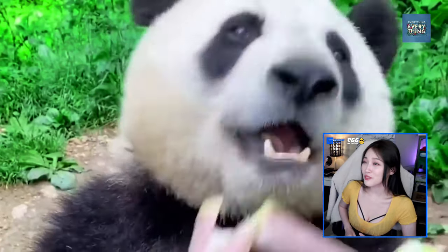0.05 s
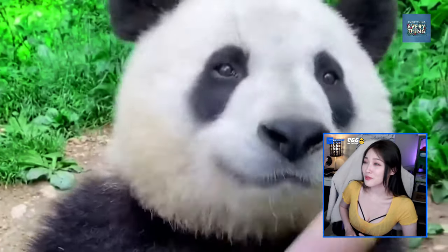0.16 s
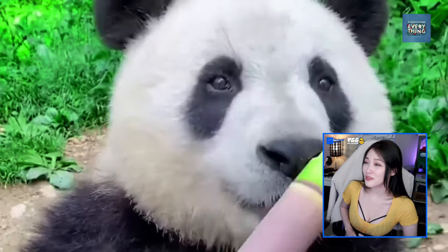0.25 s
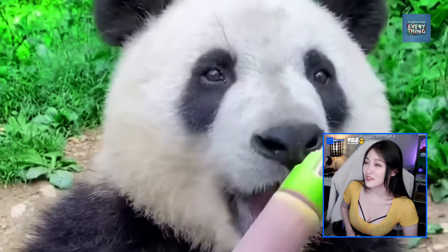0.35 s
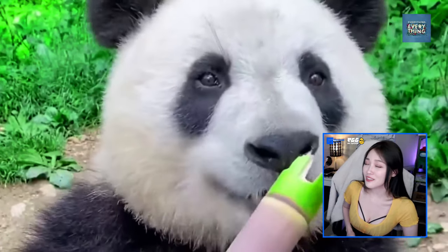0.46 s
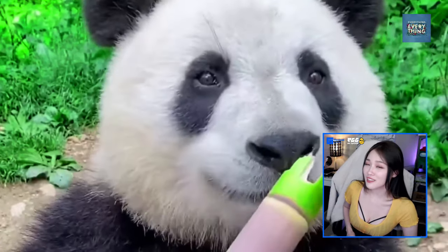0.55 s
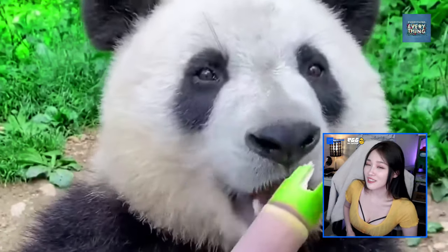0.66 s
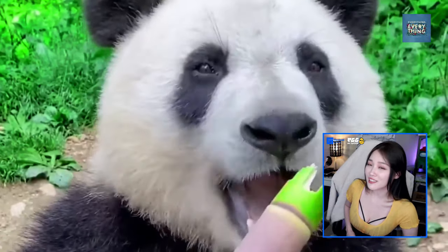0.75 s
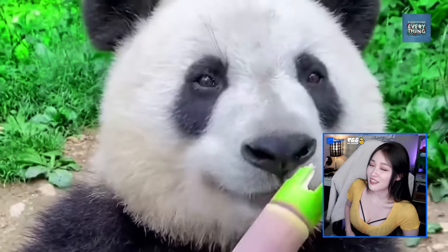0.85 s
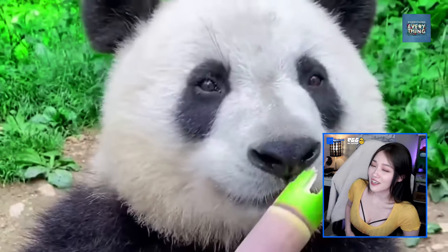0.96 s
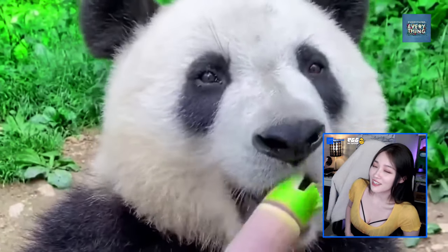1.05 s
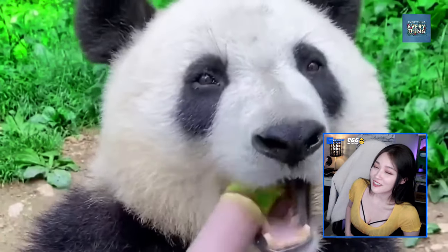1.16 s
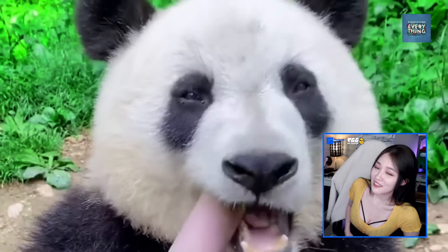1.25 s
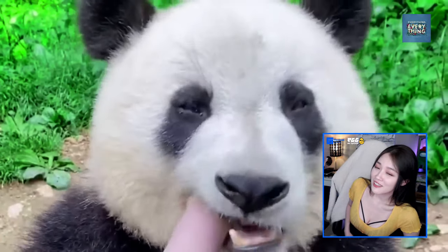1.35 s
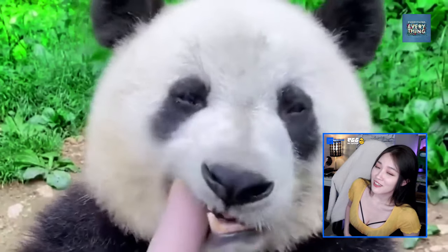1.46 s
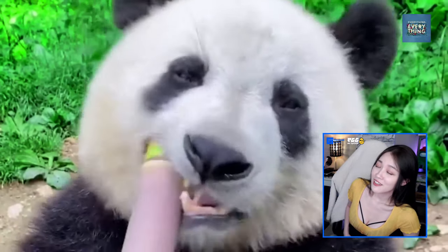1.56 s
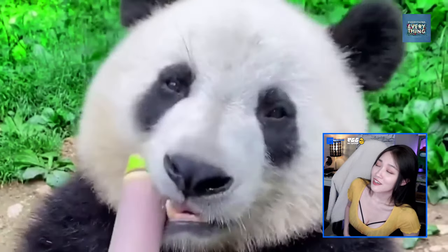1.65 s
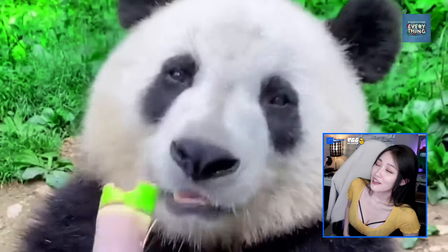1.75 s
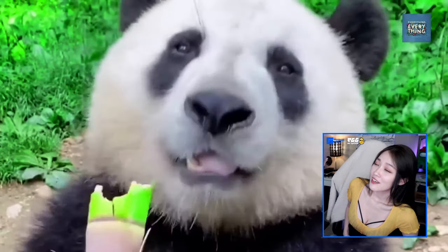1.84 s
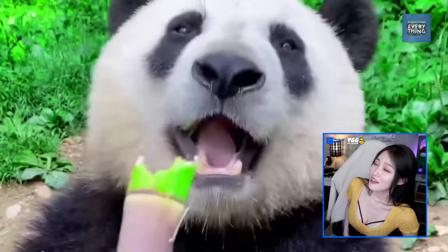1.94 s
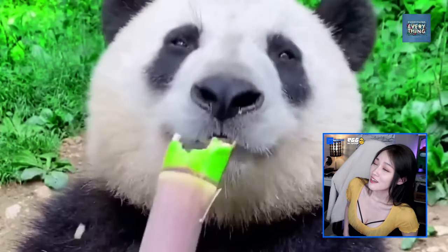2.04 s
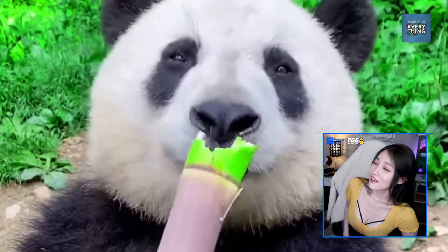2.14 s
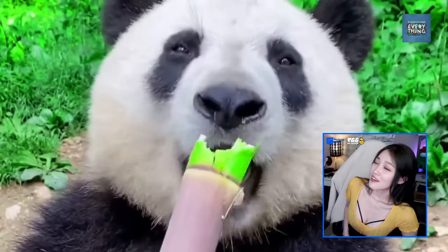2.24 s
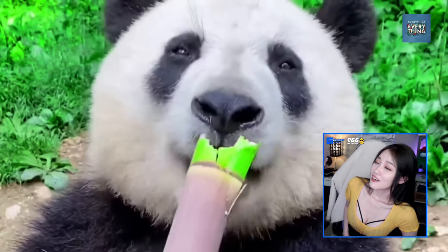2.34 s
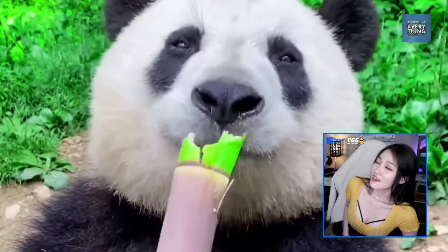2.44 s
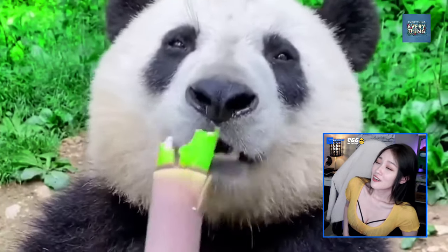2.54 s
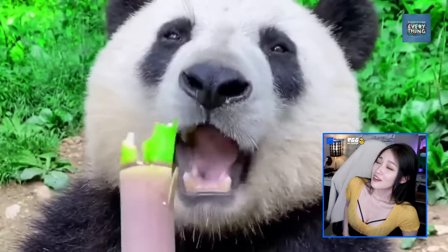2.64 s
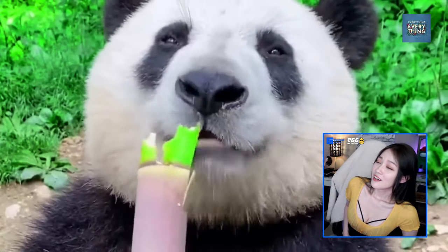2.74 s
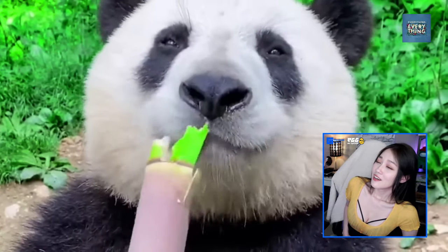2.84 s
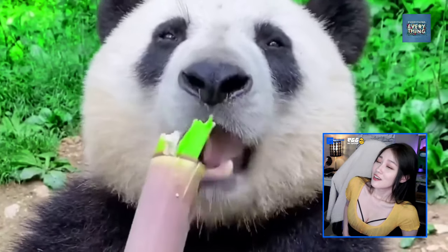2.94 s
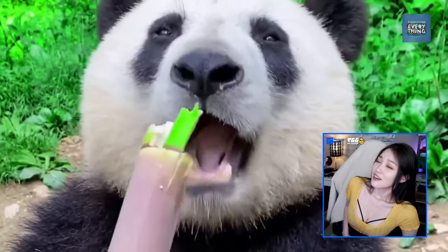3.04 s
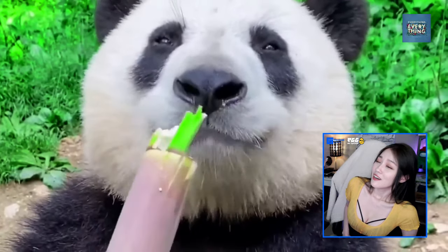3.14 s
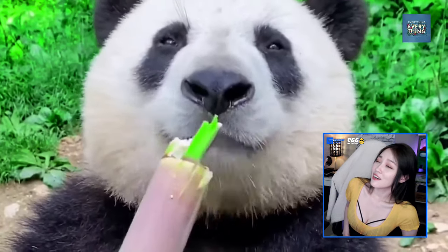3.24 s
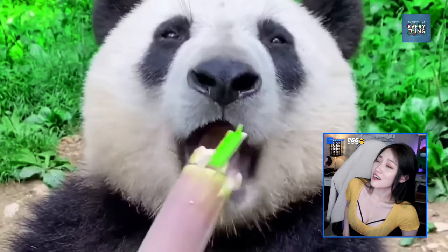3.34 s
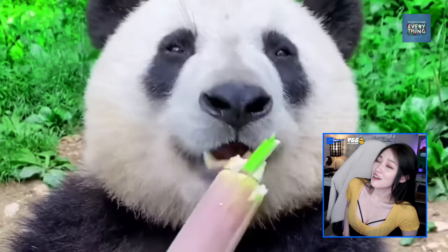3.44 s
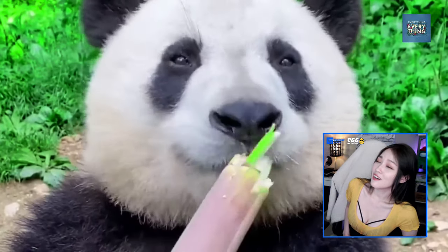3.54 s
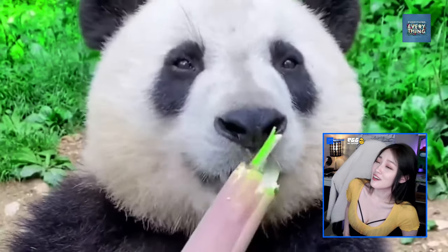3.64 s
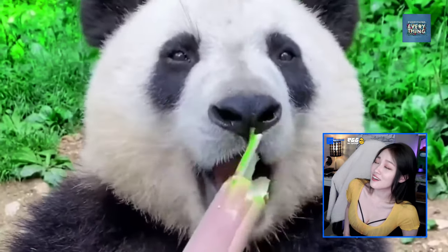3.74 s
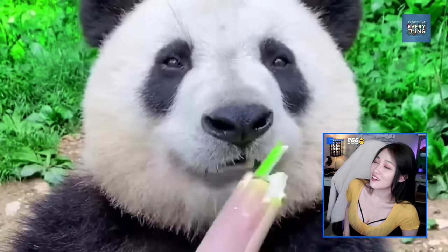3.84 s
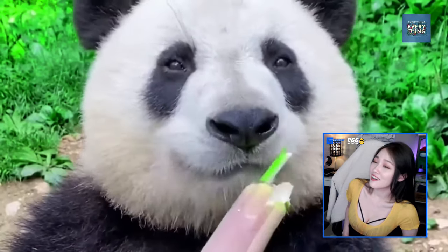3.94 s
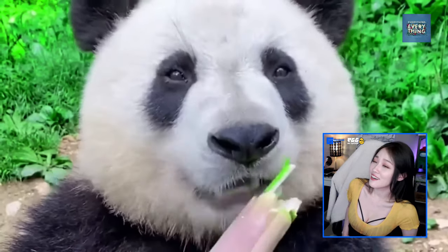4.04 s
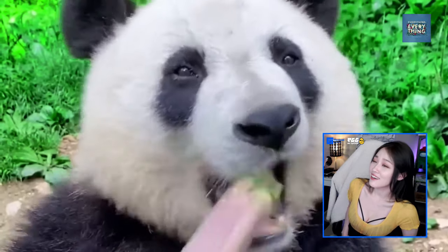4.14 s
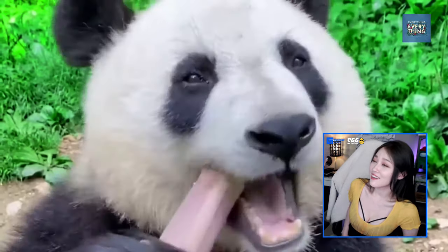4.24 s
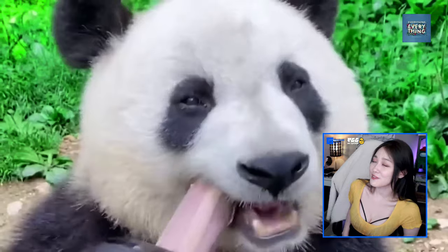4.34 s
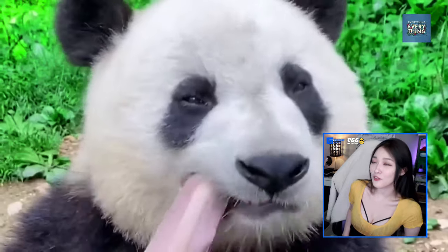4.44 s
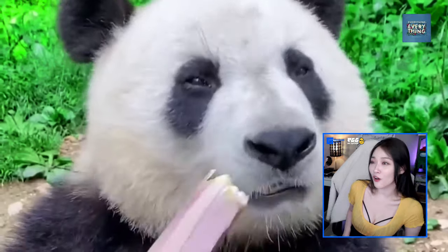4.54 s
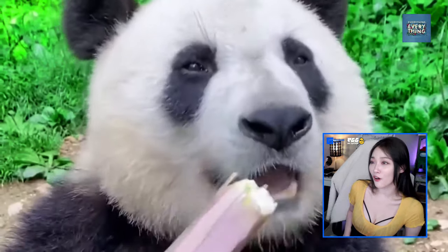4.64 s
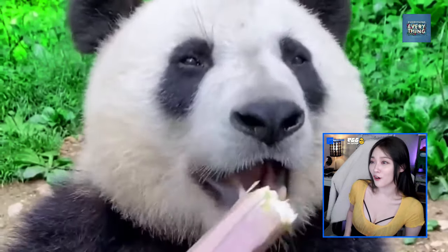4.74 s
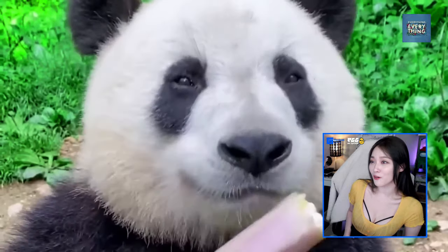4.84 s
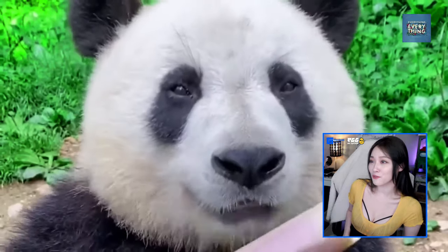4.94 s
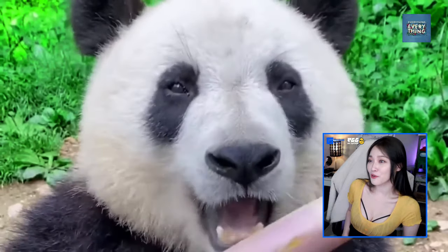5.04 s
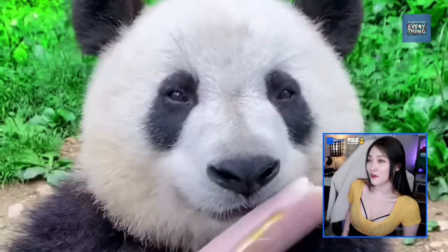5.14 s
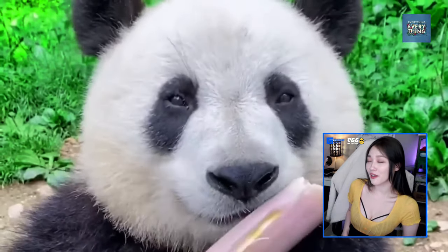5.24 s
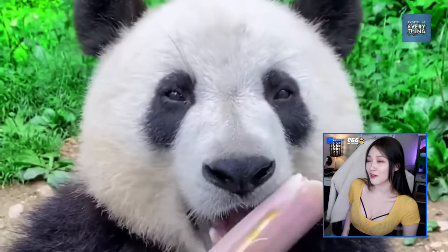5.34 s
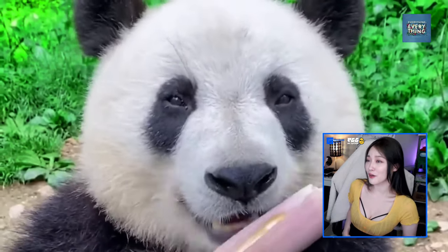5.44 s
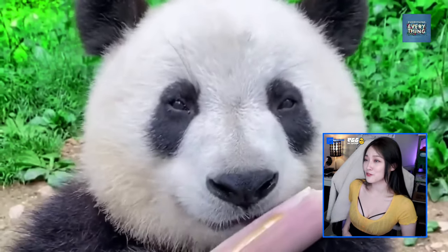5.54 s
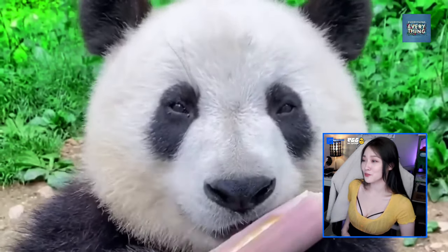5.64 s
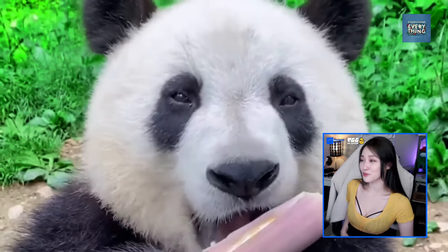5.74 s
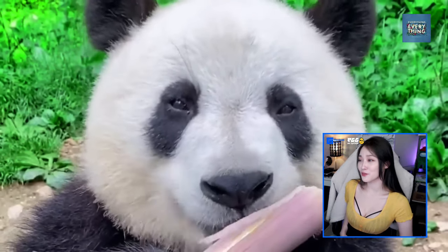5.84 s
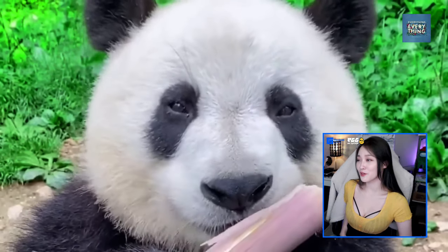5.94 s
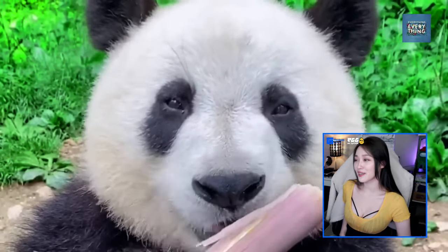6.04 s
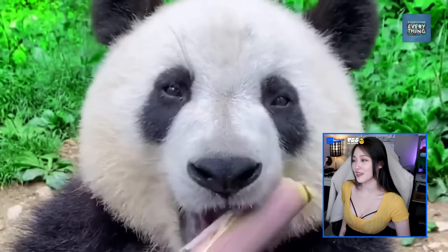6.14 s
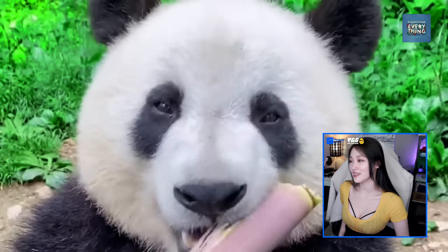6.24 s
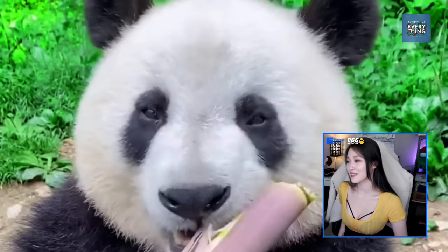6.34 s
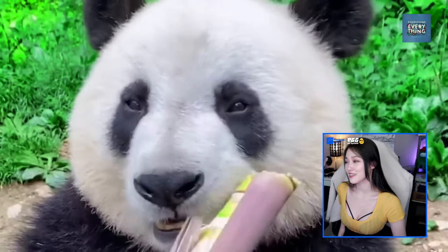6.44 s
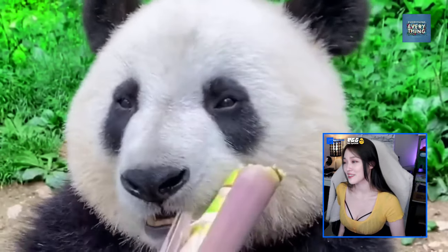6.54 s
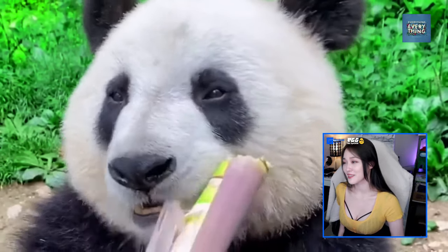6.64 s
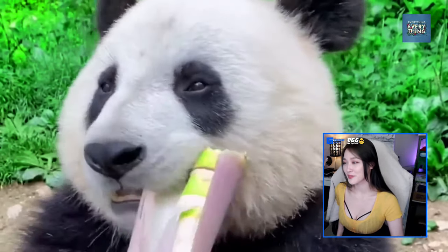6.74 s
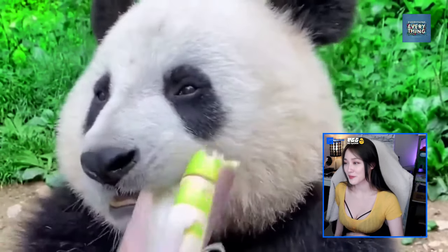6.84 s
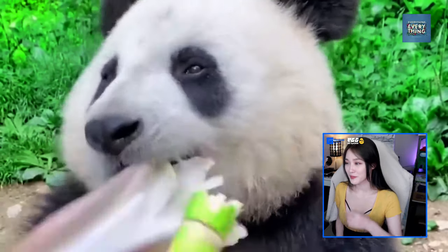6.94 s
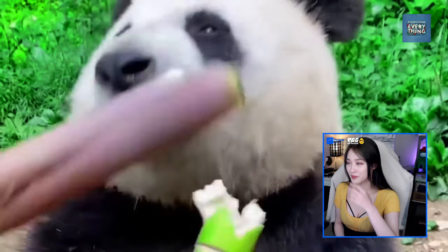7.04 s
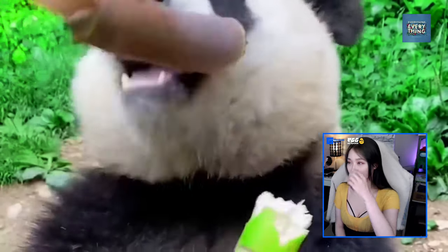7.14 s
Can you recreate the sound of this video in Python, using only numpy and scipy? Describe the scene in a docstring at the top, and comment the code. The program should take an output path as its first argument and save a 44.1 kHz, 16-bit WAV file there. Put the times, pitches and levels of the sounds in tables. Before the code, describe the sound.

Close, juicy crunching and snapping as a panda eats a fresh bamboo shoot, with soft low breath puffs and distant birds over quiet air.

```python
"""Outdoors, close to a stereo microphone, a large animal bites into a crisp plant shoot and chews it.
Every jaw stroke is a dense crackle: random bursts and a wet noise pass through the moving resonances of a mouth.
Single fibres snap as short ringing tones with a noisy crack, and the husk rips with a gliding rasp.
Breath puffs are low noise, mostly about a second and a half apart, with a dull thump under each jaw stroke.
Far birds whistle as gliding sines and twitter as a fluttering noise band, over a quiet air hiss."""
import sys
import numpy as np
from scipy import signal
from scipy.io import wavfile
from scipy.ndimage import uniform_filter1d

SR = 44100
rng = np.random.default_rng(int(sys.argv[2]) if len(sys.argv) > 2 else 0)


def master_out(mix):
    """Clip the mix to full scale and print it as 16-bit PCM to the path in sys.argv[1]."""
    frames = np.transpose(np.atleast_2d(mix))
    ceiling = np.clip(frames, -1, 1)
    pcm = np.round(ceiling * 32767).astype(np.int16)
    wavfile.write(sys.argv[1], SR, pcm)


N = 316901   # length in samples

# Jaw strokes. Each row: time of full bite in seconds, rise, hold and fall in seconds, crunch level
# (0.8-3.5 kHz) in dB, then the hollow (0.3-0.8 kHz), bright (3.5-7.5 kHz) and top (7.5-15 kHz) parts
# in dB relative to the crunch.
JAW_STROKES = [ (.004, 0.057, 0.005, 0.034, -48.5, 2.5, -12, -10),
               (0.187, 0.12, 0.024, 0.24, -39, -8.5, -5.5, -5.5),
               (0.395, 0.041, 0.0011, 0.022, -22.5, -23, -9.5, -15),
               (0.501, 0.007, 0.033, 0.034, -40, -21, -41, -25),
               (.55, .006, 0.042, 0.046, -40, -7.5, -29, -25),
               (.635, 0.0086, 0.02, 0.016, -53.5, 1.5, 1, 6),
               (.745, 0.061, 0.04, 0.039, -37, -11.5, -13, -12),
               (0.873, 0.05, .002, 0.25, -41, -2.5, -36, -26),
               (1.0, 0.022, 0.0066, 0.077, -55, -12, 5.5, 7.5),
               (1.089, 0.025, 0.0022, 0.037, -27, -16.5, -1, -19),
               (1.142, 0.01, 0.011, 0.058, -36, -1.5, -37, -17),
               (1.258, 0.011, .002, 0.017, -46.5, -1, 1.5, 3.5),
               (1.325, 0.0036, .002, 0.029, -58, 6, -18, -20),
               (1.393, 0.021, 0.0018, 0.027, -25.5, -4.5, -19, -17),
               (1.408, 0.0072, 0.018, 0.041, -22.5, -1.5, -21, -12.5),
               (1.458, 0.0055, 0.014, 0.026, -28.5, -18, -8, -11),
               (1.489, 0.016, 0.033, 0.1, -27.5, -8.5, -1.5, -2.5),
               (1.566, .02, 0.093, 0.022, -39, -23, 2.5, 4.5),
               (1.746, 0.027, .002, 0.076, -44, -5.5, 8, 15),
               (1.778, 0.0034, 0.0033, 0.034, -24, -11, -0.5, 2.5),
               (1.946, 0.019, 0.0012, 0.095, -47.5, -12.5, -15.5, -6.5),
               (2.098, 0.057, 0.012, 0.073, -31.5, -43, -13, -22),
               (2.248, 0.014, 0.072, 0.017, -32, -14, -15, -15),
               (2.428, 0.049, .002, 0.2, -37, -7.5, -14, -14.5),
               (2.592, 0.013, 0.041, .02, -41, -19, -17, -16),
               (2.623, 0.012, 0.047, 0.053, -33.5, -8.5, -12.5, -10),
               (2.768, 0.015, 0.011, 0.21, -35, -22, -48, -27),
               (2.956, 0.0038, 0.011, 0.011, -36.5, -30, -22, -22),
               (2.979, 0.0032, 0.045, 0.036, -27.5, -28, -17, -15),
               (3.07, .02, 0.014, 0.019, -50, -25, -33, -22.5),
               (3.182, 0.028, 0.036, 0.035, -31.5, -42, -6, -10.5),
               (3.324, 0.031, 0.006, 0.022, -40.5, -6, -4, -20),
               (3.361, 0.023, 0.046, 0.016, -39, -14.5, -17, -22),
               (3.522, 0.062, 0.0023, 0.29, -35.5, -52, -18, -19),
               (3.72, 0.024, 0.021, .02, -47.5, -15, 2, -5),
               (3.761, 0.017, 0.029, 0.023, -30, -15, -43, -24),
               (3.88, 0.43, .002, 0.56, -46, -2.5, -18, -14),
               (4.09, 0.036, 0.0086, 0.028, -43, -8, -3, -1.5),
               (4.15, 0.059, 0.031, 0.014, -39.5, -24, -4, -27),
               (4.311, 0.14, .002, 0.23, -42.5, -39, 2, 2), (4.42, 0.055, 0.065, .02, -30, -15, -0.5, -7),
               (4.472, 0.012, 0.03, 0.02, -23, -14, -1, -5.5), (4.503, .02, 0.0052, 0.022, -19, -9, 1, -10),
               (4.577, 0.12, 0.0013, 0.099, -44.5, -4.5, 0, -6.5),
               (4.713, 0.032, 0.0017, 0.061, -54, 6, -3.5, -16),
               (4.866, 0.037, 0.03, 0.098, -35.5, -6, -2, -5.5),
               (5.023, 0.02, 0.035, 0.041, -24.5, -13.5, -7, -12),
               (5.197, 0.023, 0.066, 0.018, -42.5, -8, -6, -19),
               (5.28, 0.052, 0.078, .02, -53, -4, 2.5, 8.5),
               (5.368, 0.032, 0.0027, 0.037, -24.5, -12, -6, -15),
               (5.551, 0.035, 0.037, 0.083, -39, -13, -3.5, -20),
               (5.62, 0.12, 0.022, 0.023, -54.5, 10.5, -5, -20),
               (5.719, 0.042, 0.013, .02, -49.5, -5, -4, -11),
               (5.787, 0.027, 0.0023, 0.034, -32, -6.5, -23, -22),
               (5.895, 0.011, 0.1, 0.019, -38, -13.5, -22, -23.5),
               (6.028, 0.037, 0.011, 0.017, -63.5, 2, 17.5, 7),
               (6.099, .03, 0.034, 0.02, -52.5, -9, 4.5, -3),
               (6.152, 0.0037, 0.038, 0.03, -37, -39, -13, -30),
               (6.288, 0.022, 0.071, 0.032, -38, -12, 0, -6.5),
               (6.396, 0.018, 0.15, 0.017, -39.5, -13, -5, -3.5),
               (6.7, 0.05, 0.23, 0.026, -45, -35, -0.5, 3),
               (6.919, 0.097, 0.084, 0.085, -27.5, -22, -7, -8.5),
               (7.0, 0.026, 0.07, 0.039, -31.5, -10.5, -10, -9.5),
               (7.115, 0.053, 0.083, 0.056, -39.5, -12, -7, -5.5)]
# How closely each part follows the swell and fade of a stroke. One row: share (no unit) for the
# hollow, crunch, bright and top parts.
SWELL_SHARES = (1, 1, 1, 0.85)
# Tone colour of the crushed plant. Each row: frequency in Hz, relative level in dB per Hz.
CRUNCH_COLOUR = [(150, -52), (250, -52), (386, -10.5), (597, -15), (1020, 0), (1850, 1.5), (2200, -7.5),
                 (3400, -4.5), (5500, -9), (7400, -37), (16000, -32)]
# Moving mouth resonances. Each row: time in seconds, first resonance in Hz, second resonance in Hz,
# level of the second in dB relative to the first.
MOUTH_RESONANCES = [(0.0, 850, 2260, -7), (0.1, 1090, 2460, 7), (0.2, 890, 2090, -1),
                    (0.422, 1570, 2620, -4), (0.48, 925, 2430, -18), (0.56, 1190, 2460, -1.5),
                    (0.98, 1130, 2600, -1), (1.08, 1520, 2180, -13), (1.32, 779, 2600, 3),
                    (1.34, 1010, 2400, 0), (1.86, 1270, 2380, 9.5), (2.08, 926, 2400, 1.5),
                    (2.7, 1320, 2210, -5), (2.74, 860, 2450, -9), (2.96, 1310, 2420, 13.5),
                    (3.2, 876, 2320, 6.5), (3.44, 1370, 2200, -2), (3.48, 990, 2830, -7.5),
                    (3.7, 1000, 2233, 11), (3.72, 1420, 2700, 10), (3.82, 1180, 2180, -12),
                    (3.86, 1020, 3170, -3), (4.04, 1220, 2150, 3), (4.2, 1440, 2650, 4),
                    (4.24, 1110, 1990, -2), (4.46, 1150, 2450, 7), (4.74, 795, 2310, 8),
                    (4.78, 990, 2500, 11), (4.94, 880, 2100, -5), (4.98, 1540, 2200, 8.5),
                    (5.2, 1090, 2320, 4), (5.42, 1490, 2480, 15), (5.44, 960, 2460, 5),
                    (5.92, 1410, 2480, 3), (6.04, 1110, 2440, 7), (6.16, 1170, 2080, 0),
                    (6.36, 960, 3080, 18), (6.4, 766, 2200, -4), (6.48, 950, 3000, 15.5),
                    (6.57, 780, 2870, -7), (6.84, 1650, 2190, 17), (6.92, 930, 1980, -6),
                    (7.05, 1270, 2450, 0), (7.19, 950, 2150, -17)]
# Fibre snaps. Each row: time in seconds, peak of the ring in dB, pitch of the ring in Hz, peak of the
# crack in dB relative to the ring.
FIBRE_SNAPS = [(0.233, -38.5, 380, -15), (0.384, -25.5, 1570, 4), (0.398, -37.5, 420, 16),
               (0.494, -37.5, 1020, -19), (0.548, -35.5, 3700, -14), (0.63, -39, 1490, 7),
               (0.739, -33.5, 1070, -3), (0.745, -42, 382, -17), (0.874, -24.5, 1020, -38),
               (0.996, -36.5, 5500, 12), (1.065, -32, 4640, -21), (1.078, -34, 1570, -12),
               (1.089, -17.5, 1530, -23), (1.146, -28.5, 1840, 13.5), (1.153, -27, 1840, 10),
               (1.325, -42, 700, 9.5), (1.388, -24, 4360, 4), (1.392, -16.5, 1420, -10),
               (1.392, -16, 2060, -18), (1.41, -8.5, 2226, -6), (1.411, -9, 473, -19),
               (1.424, -15.5, 1010, -8), (1.459, -23, 4170, -7), (1.466, -32, 1090, 3),
               (1.483, -26, 4300, 14), (1.499, -21.5, 1075, 14), (1.529, -21.5, 1420, 6),
               (1.598, -30.5, 900, 12), (1.611, -31, 1510, 15), (1.623, -29, 5730, 0),
               (1.628, -25.5, 4600, 9), (1.652, -42, 1300, 16), (1.663, -40, 3000, 23),
               (1.728, -28, 5550, 7), (1.746, -24, 2420, 7), (1.762, -23.5, 2160, 6.5),
               (1.774, -38, 2520, 11), (1.782, -10.5, 3510, 5), (1.905, -43, 3040, 13),
               (2.054, -43, 1020, -1.5), (2.092, -23, 3440, -20), (2.102, -22.5, 3330, -11),
               (2.186, -44, 3500, 8), (2.246, -23, 2520, -12), (2.265, -14.5, 1097, 5),
               (2.295, -26, 2500, 5), (2.298, -30, 760, -15), (2.423, -30, 1040, -26),
               (2.624, -11, 1240, -9), (2.659, -25, 2220, -14), (2.767, -26.5, 980, -18),
               (2.8, -29.5, 965, -30), (2.865, -31, 1250, 9.5), (2.956, -40, 1450, -6),
               (2.978, -24.5, 2450, 11.5), (2.984, -19, 1390, -16), (3.001, -14.5, 1030, -11),
               (2.997, -36, 384, -19.5), (3.017, -20, 2480, -16), (3.038, -41, 420, -9),
               (3.177, -27, 2340, -9), (3.186, -25, 4700, -17), (3.187, -21, 2500, -21),
               (3.202, -18.5, 2390, -9), (3.249, -44, 283, -15), (3.288, -36.5, 5240, 15.5),
               (3.324, -35, 4530, -12), (3.325, -47, 453, -17), (3.368, -22.5, 990, 8),
               (3.4, -27, 1430, -20), (3.764, -34, 1480, -18), (3.766, -36.5, 428, -15),
               (3.784, -19.5, 1164, -26), (3.889, -31.5, 990, 11.5), (4.023, -33, 5030, 13),
               (4.142, -41, 407, -13), (4.156, -29.5, 4460, 12), (4.303, -33, 2050, -9),
               (4.418, -23, 1470, 5), (4.426, -22, 790, -5), (4.446, -18.5, 1410, 5.5),
               (4.472, -11, 5250, 8), (4.496, -24, 3830, 15), (4.504, -19, 4700, -1),
               (4.508, -26, 604, -19.5), (4.567, -41, 1030, 3), (4.807, -36.5, 4050, 5.5),
               (4.867, -26.5, 2400, -16), (4.876, -32, 870, 14.5), (4.93, -38, 910, 7),
               (5.012, -24, 1540, -5), (5.023, -15, 1470, -23), (5.199, -33, 1690, -30),
               (5.348, -48, 338, -22), (5.359, -21, 2450, -23), (5.368, -17, 1600, -35),
               (5.545, -49, 4150, -13), (5.656, -33.5, 4100, 13), (5.748, -37, 3700, 9),
               (5.77, -21.5, 4140, 3.5), (5.793, -32.5, 482, -7), (5.901, -23, 1550, -20),
               (5.926, -29, 2170, -12), (5.962, -25.5, 2400, -23.5), (6.043, -36.5, 4580, -3),
               (6.125, -30.5, 3800, -14), (6.154, -37, 2100, 12), (6.188, -36, 1160, -12),
               (6.287, -25.5, 3050, -1), (6.325, -30.5, 646, -11.5), (6.31, -25, 4940, -15),
               (6.34, -18.5, 3230, 10), (6.398, -28, 1980, -6), (6.412, -17.5, 4600, 7),
               (6.419, -28, 766, -11), (6.487, -22, 3100, -4), (6.49, -21, 3200, 6),
               (6.501, -28, 3000, -23), (6.542, -24, 2960, -29), (6.55, -33.5, 783, 13),
               (6.711, -31, 3100, 17), (6.795, -26.5, 3580, 7), (6.824, -39.5, 2110, 13.5),
               (6.918, -32, 1030, -1), (6.927, -19, 960, -8), (6.948, -21.5, 1300, 3),
               (6.957, -20.5, 1560, -8), (6.975, -22, 1530, 12), (6.985, -21, 2020, -1),
               (7.035, -23, 1550, 10), (7.064, -40, 2440, -6)]
# Breath puffs. Each row: time of full flow in seconds, length of rise and fall together in seconds,
# level in dB.
BREATH_PUFFS = [(0.933, 0.55, -41), (2.49, 0.46, -42), (3.927, 0.45, -40), (5.374, 0.48, -46.5),
                (6.29, 0.21, -50.5)]
# Tone colour of the breath. Each row: frequency in Hz, relative level in dB per Hz.
BREATH_SPECTRUM = [(18, -65), (30, -21), (75, 8.5), (125, 11), (192, 5.5), (313, 0), (436, 0), (700, -29),
                   (910, -37.5), (1540, -120)]
# Far bird whistles. Each row: start in seconds, length in seconds, first pitch in Hz, last pitch in Hz,
# level in dB.
BIRD_WHISTLES = [(.4, 0.21, 5080, 5050, -64), (1.965, 0.28, 4990, 4630, -51),
                 (3.32, 0.21, 4190, 4220, -50.5), (3.45, 0.1, 4350, 4370, -55),
                 (3.6, 0.099, 6200, 6080, -60), (3.777, .19, 6400, 6350, -60),
                 (4.02, 0.12, 5080, 5120, -59)]
# Far twittering. Each row: time it reaches full level in seconds, time held there in seconds, level in dB.
TWITTERS = [(3.443, .15, -54.5), (3.624, 0.072, -62), (3.933, 0.395, -59)]
# Tone colour of the air hiss. Each row: frequency in Hz, relative level in dB per Hz.
AIR_COLOUR = [(15, -22), (40, -3), (200, -21), (450, -10.5), (714, -3.5), (2480, -7), (12200, -17),
              (14800, -38.5), (16000, -35.5)]
# Stereo width. Each row: frequency in Hz, side level in dB relative to the mid level.
STEREO_WIDTH = [(60, -26), (240, -5.5), (950, -7.5), (3770, -5.5), (15000, -6)]

SWELL_DB = 25   # how far a rise or a fall goes in its stated time
CELLS_PER_S = 350   # average number of bursts in each of the four parts
MOUTH_LIFT_DB, MOUTH_WIDTH_OCTAVES = 10.5, 0.2
RIP_S, RIP_LENGTH_S, RIP_SETTLE_S, RIP_FADE_S = 6.41, 0.158, 0.049, 0.011
RIP_FROM_HZ, RIP_TO_HZ = 4400, 3120
RIP_DB, RIP_SAG_DB_PER_S = -34, 25
PUFF_RISE_SHARE = 0.46   # share of a puff's length
REST_DB, THUMP_DB = -75.5, -31   # flow between puffs; jaw thump relative to the crunch
WHISTLE_FADE_S, WHISTLE_SETTLE_S, WHISTLE_SAG_DB_PER_S = 0.035, 0.055, 10
AIR_DB = -57
CUTOFF_HZ = 16500


def jaw_gains(cut_db):
    """Gains of the hollow, crunch, bright and top parts: each stroke swells, holds, fades and is cut off."""
    gains = np.zeros((4, N))
    for s, rise_s, hold_s, fall_s, db, hollow_db, bright_db, top_db in JAW_STROKES:
        start = max(0, int((s - 2 * rise_s) * SR))
        end = int((s + hold_s + 2 * fall_s) * SR)
        span = slice(start, end)
        shape_db = swell_db(np.arange(N)[span] / SR - s, rise_s, hold_s, fall_s)
        # Far below full level, both slopes become much steeper.
        cut_off_db = 3 * np.minimum(0, shape_db + cut_db)
        shapes_db = np.outer(SWELL_SHARES, shape_db) + cut_off_db
        parts_db = db + np.array([[hollow_db], [0], [bright_db], [top_db]])
        # Where strokes overlap, the louder one counts.
        gains[:, span] = np.maximum(gains[:, span], amp(parts_db + shapes_db))
    return gains


def crushing(jaw, size_db, wet_db, sharpness, clump_db, mouth_db):
    """Cells burst in clumps over a wet squelch; the moving mouth opens and shuts many narrow resonances."""
    born = rng.random((4, N)) < CELLS_PER_S / SR   # separate cells for each part
    sizes = born * amp(size_db * np.minimum(rng.exponential(1, (4, N)), 3.0))
    # Each burst dies away with a time constant under a millisecond.
    bursts = rms_one(signal.lfilter([1], [1, -0.96], sizes))
    pressure = (bursts + amp(wet_db)) * amp(clump_db * drift(32))
    white = rng.standard_normal((2, 2, N))
    parts = np.zeros((4, 2, N))
    for k, hz in enumerate(np.geomspace(330, 14000, 30)):
        part = np.searchsorted([800, 3500, 7500], hz)
        mid, side = resonance(white[k % 2] * pressure[part], hz, hz / sharpness)
        gain_db = at_hz(CRUNCH_COLOUR, hz) + mouth_db * (1000 / hz) ** 0.067 * drift(11.85)
        if 550 < hz < 4500:
            gain_db = gain_db + mouth_lift_db(hz)
        parts[part] += amp(gain_db) * spread(mid, side, hz)
    # Level out the slow swings, so that the jaw alone sets the slow level.
    power = (parts ** 2).mean(axis=1)
    slow_level = np.sqrt(uniform_filter1d(power, size=2200) + 1e-12)
    return (jaw / slow_level)[:, None] * parts


def mouth_lift_db(hz):
    """Lift at this pitch from the two moving mouth resonances, worked out at every 20th sample."""
    s, first_hz, second_hz, second_db = np.transpose(MOUTH_RESONANCES)
    t = np.arange(0, N + 20, 20) / SR
    near = []   # 1 on a resonance, towards 0 away from it
    for track_hz in (first_hz, second_hz):
        octaves_away = np.log2(hz / np.interp(t, s, track_hz))
        near.append(np.exp(-(octaves_away / MOUTH_WIDTH_OCTAVES) ** 2))
    second_lift_db = MOUTH_LIFT_DB + np.interp(t, s, second_db)
    lift_db = MOUTH_LIFT_DB * near[0] + second_lift_db * near[1]
    return np.repeat(lift_db, repeats=20)[:N]


def snaps(cycles, low_damping, knock_db, knock_s, burst_s, tick_s, tail_s, tail_db, dull_hz, right_lean_db):
    """A fibre tears: a few cycles at its pitch, a short higher knock, a broad tick and a tail of splinters."""
    out, t = np.zeros((2, N + 3000)), np.arange(3000) / SR
    for s, db, hz, crack_db in FIBRE_SNAPS:
        noise = rng.standard_normal((4, len(t)))
        push_s = burst_s + 0.5 / hz   # low pops swell more slowly
        push = (1 + np.abs(noise[0])) * t / push_s * np.exp(-t / push_s)
        ring_s = cycles / hz * (hz / 1000) ** low_damping   # time to fall by 60 dB
        body = ring(push * np.cos(2 * np.pi * hz * t), hz, ring_s)
        knock = resonance(noise[3] * np.exp(-t / knock_s), 1.7 * hz, 0.5 * hz)
        body = body / np.abs(body).max() + amp(knock_db) * knock / np.abs(knock).max()

        tick = np.exp(-t / tick_s)
        shape = tick + amp(tail_db) * (np.exp(-t / tail_s) - tick)
        # Thin fibres, with a higher pitch, crack brighter.
        broad = signal.butter(3, [700, dull_hz + 2 * hz], "band", fs=SR, output="sos")
        crack = signal.sosfilt(broad, spread(*noise[1:3], 4000) * shape)

        # Hollow pops come from the stalk, on the right.
        lean = amp(right_lean_db * (hz < 600) * np.array([[0], [1]]))
        snap = lean * body + amp(crack_db) * crack / np.abs(crack).max()
        at = round(s * SR)
        out[:, at:at + len(t)] += amp(db) * snap
    return out[:, :N]


def rip(width_hz, grain_db):
    """The husk rips: grainy narrow noise carried along the gliding pitch of the tearing strip."""
    low_pass = signal.butter(2, width_hz, fs=SR, output="sos")
    slow = signal.sosfilt(low_pass, rng.standard_normal((2, N)))
    tone = glide(RIP_S, RIP_LENGTH_S, RIP_FROM_HZ, RIP_TO_HZ, RIP_SETTLE_S, RIP_FADE_S)
    sagging_db = RIP_DB - RIP_SAG_DB_PER_S * (np.arange(N) / SR - RIP_S)
    level_db = np.minimum(sagging_db, RIP_DB) + grain_db * drift(180)
    return rms_one(spread(*slow, 3500)) * tone * amp(level_db)


def breath(jaw):
    """Low puffs of air, a faint flow between them and a dull thump under each jaw stroke."""
    t = np.arange(N) / SR
    flow = np.zeros(N)
    for s, length_s, db in BREATH_PUFFS:
        rise_s, fall_s = PUFF_RISE_SHARE * length_s, (1 - PUFF_RISE_SHARE) * length_s
        flow += amp(db + swell_db(t - s, rise_s, 0, fall_s))
    rest = amp(REST_DB + 6 * drift(3))
    thump = amp(THUMP_DB) * uniform_filter1d(jaw, size=1300)
    low = banded_noise(BREATH_SPECTRUM, patchy_db=2.0)
    high_pass = signal.butter(5, 120, "high", fs=SR, output="sos")
    puffs = signal.sosfilt(high_pass, (flow + rest) * low)
    return puffs + thump * low


def birds(blur_hz, blur_db):
    """Thin whistles that fade as they go, fluttering and blurred by leaves on the way."""
    t = np.arange(N) / SR
    out = np.zeros(N)
    for s, length_s, from_hz, to_hz, db in BIRD_WHISTLES:
        level_db = db - WHISTLE_SAG_DB_PER_S * np.clip(t - s, 0, length_s)
        out += amp(level_db) * glide(s, length_s, from_hz, to_hz, WHISTLE_SETTLE_S, WHISTLE_FADE_S)
    flutter = amp(2.5 * drift(20))
    blur = amp(blur_db) * np.array([drift(blur_hz), drift(blur_hz)])   # different on left and right
    return out * (flutter + blur)


def twitter(low_hz, high_hz, patchy_db):
    """A faint far twittering: a fluttering band of high noise."""
    band_pass = signal.butter(3, [low_hz, high_hz], "band", fs=SR, output="sos")
    band = signal.sosfilt(band_pass, rng.standard_normal((2, N)))
    t = np.arange(N) / SR
    level = sum(amp(db + swell_db(t - s, 0.061, hold_s, 0.089)) for s, hold_s, db in TWITTERS)
    return level * rms_one(band) * amp(patchy_db * drift(25))


def air_hiss(patchy_db):
    """A quiet hiss of air: banded noise whose level wanders slowly."""
    return amp(AIR_DB + 2 * drift(2)) * banded_noise(AIR_COLOUR, patchy_db)


def banded_noise(spectrum, patchy_db):
    """Half-octave bands of stereo noise, each with its own level and flicker; overall rms 1."""
    out, edges = 0, 25 * 2 ** np.arange(0, 9.6, 0.5)
    white = rng.standard_normal((2, 2, N))
    for k, (low, high) in enumerate(zip(edges, edges[1:])):
        band_pass = signal.butter(2, [low, high], "band", fs=SR, output="sos")
        mid, side = signal.sosfilt(band_pass, white[k % 2])
        hz = np.sqrt(low * high)
        gain = amp(at_hz(spectrum, hz) + patchy_db * drift(20.1))
        out = out + gain * spread(mid, side, hz)
    return rms_one(out)


def glide(s, length_s, from_hz, to_hz, settle_s, fade_s):
    """A sine, faded at both ends, that slides from one pitch and settles towards another."""
    out, t = np.zeros(N), np.arange(int(length_s * SR)) / SR
    hz = to_hz + (from_hz - to_hz) * np.exp(-t / settle_s)
    fade = np.clip(np.minimum(t, length_s - t) / fade_s, 0, 1)
    at = int(s * SR)
    out[at:at + len(t)] = fade * np.sin(2 * np.pi * np.cumsum(hz) / SR)
    return out


def ring(x, hz, t60):
    """A two-pole resonator: a unit click sets a sine ringing, which falls 60 dB in t60 seconds."""
    r, w = amp(-60 / (t60 * SR)), 2 * np.pi * hz / SR
    return signal.lfilter([0, np.sin(w)], [1, -2 * r * np.cos(w), r * r], x + 1e-18)


def resonance(x, hz, width_hz):
    """A band-pass resonance with a gain of about 1 at its peak."""
    r = np.exp(-np.pi * width_hz / SR)
    feedback = [1, -2 * r * np.cos(2 * np.pi * hz / SR), r * r]
    return signal.lfilter([(1 - r * r) / 2, 0, (r * r - 1) / 2], feedback, x)


def swell_db(t, rise_s, hold_s, fall_s):
    """Straight rise, hold and fall in dB below full level, at times t counted from full level."""
    before = -t / max(rise_s, 1e-3)
    after = (t - hold_s) / max(fall_s, 1e-3)
    return -SWELL_DB * np.maximum(0, np.maximum(before, after))


def drift(rate_hz):
    """Slow chance: noise at every 20th sample through a double one-pole low-pass; spread 1."""
    r = np.exp(-40 * np.pi * rate_hz / SR)
    noise = rng.standard_normal(N // 20 + 2002)
    slow = signal.lfilter([1], [1, -2 * r, r * r], noise)[2000:]   # skip the filter's start
    return np.interp(np.arange(N) / 20, np.arange(len(slow)), rms_one(slow))


def spread(mid, side, hz):
    """Left and right from a mid and a side signal, as wide as the microphone pair is at this pitch."""
    return mid + amp(at_hz(STEREO_WIDTH, hz)) * side * [[1], [-1]]


def at_hz(points, hz):
    """A spectrum table read on a log-frequency axis."""
    table_hz, table_db = np.transpose(points)
    return np.interp(np.log(hz), np.log(table_hz), table_db)


def amp(db):
    """Gain of a level in dB."""
    return 10 ** (np.asarray(db) / 20)


def rms_one(x):
    """The signal scaled to an rms (average strength) of 1."""
    return x / np.sqrt(np.mean(x ** 2) + 1e-20)


def scene():
    """Mouth sounds, breath, far birds and air added together."""
    jaw = jaw_gains(cut_db=33.5)
    crushed = crushing(jaw, size_db=5.5, wet_db=3.0, sharpness=15.0, clump_db=2.5, mouth_db=3.5)
    mouth = crushed.sum(axis=0)
    mouth += snaps(cycles=10.0, low_damping=0.25, knock_db=-2.5, knock_s=0.0011, burst_s=0.0002,
                   tick_s=0.0004, tail_s=0.0059, tail_db=-18, dull_hz=2200, right_lean_db=7.0)
    mouth += rip(width_hz=450, grain_db=3.5)
    # The mouth sounds carry little bass.
    mouth = signal.sosfilt(signal.butter(3, 260, "high", fs=SR, output="sos"), mouth)
    far = birds(blur_hz=70, blur_db=-7) + twitter(low_hz=5000, high_hz=6000, patchy_db=4.0)
    return mouth + breath(jaw[1]) + far + air_hiss(patchy_db=3.5)


def record(dry):
    """The microphones roll off the treble, the left is a little quieter, peaks are rounded, the top is cut."""
    dry = signal.sosfilt(signal.butter(2, 12500, fs=SR, output="sos"), dry)
    dry = dry * amp([[-0.4], [0.4]])   # left, right in dB
    rounded = 1.277 * np.tanh(dry / 1.298)
    return signal.sosfilt(signal.cheby2(12, 60, CUTOFF_HZ, fs=SR, output="sos"), rounded)


dry = scene()
out = record(dry)
master_out(out)
```